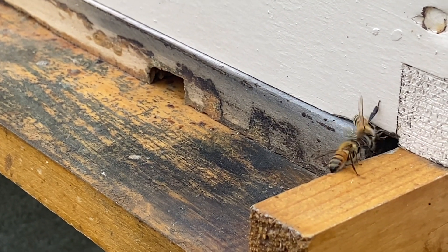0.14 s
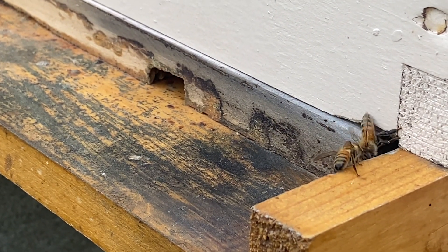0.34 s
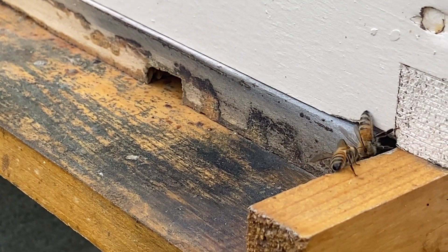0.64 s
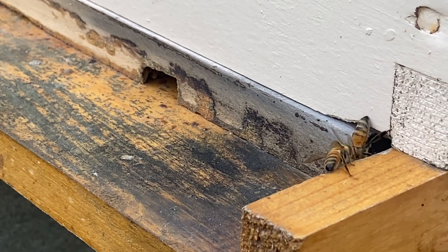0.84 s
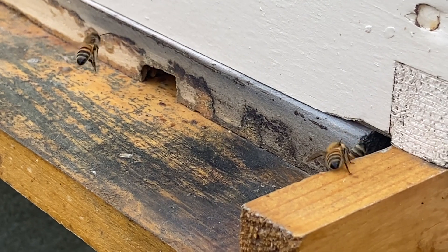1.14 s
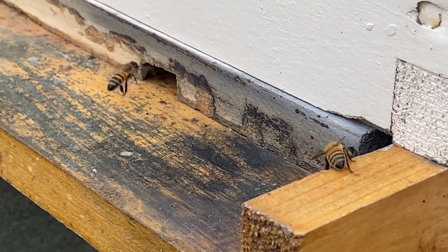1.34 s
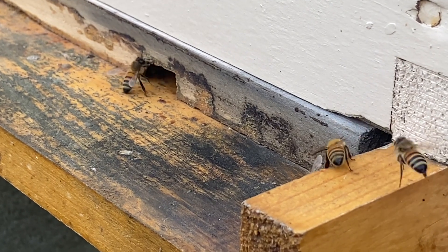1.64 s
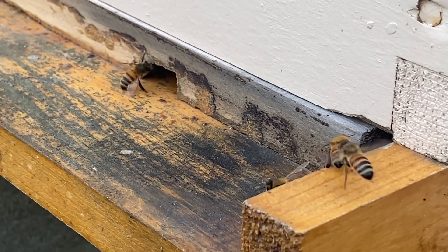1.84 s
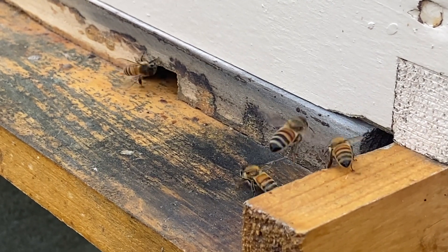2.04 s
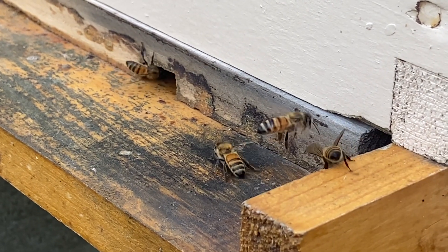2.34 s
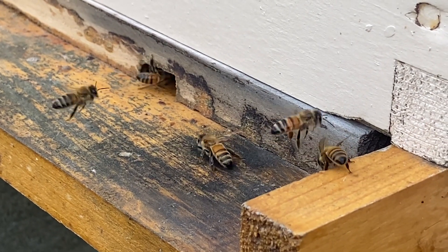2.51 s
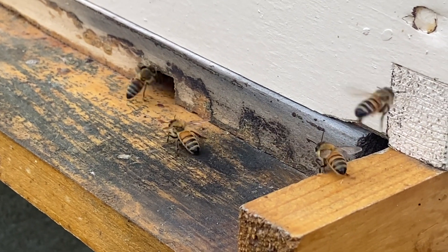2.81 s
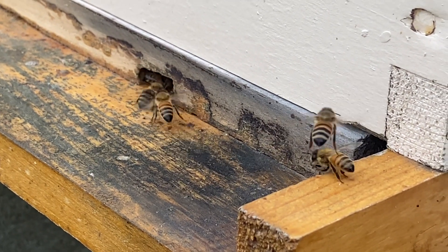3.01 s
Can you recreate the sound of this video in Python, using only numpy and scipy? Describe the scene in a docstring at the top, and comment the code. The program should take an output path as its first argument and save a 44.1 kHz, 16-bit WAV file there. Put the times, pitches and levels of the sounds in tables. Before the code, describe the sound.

Faint bee wingbeats swell and fade close to the microphone, strongest around one second, then lower near two; light wing scrapes and dull taps follow on wood, with colony hum and distant outdoor rumble throughout.

```python
"""A distant low rumble and a soft wash of open air run throughout, with a hive colony humming behind.
Honeybees come and go at the entrance, close to the microphone; one passes close after a second.
Each is a faint stack of wingbeat harmonics plus puffs of air-noise timed to the strokes.
Wings brush the landing board in short bursts of noise, bodies bump it, and feet tick on the wood."""
import sys
import numpy as np
from scipy import signal
from scipy.fft import rfft, irfft
from scipy.io import wavfile
from scipy.ndimage import uniform_filter1d

SR = 44100
rng = np.random.default_rng(int(sys.argv[2]) if len(sys.argv) > 2 else 0)


def unload_audio(sound):
    """Save the sound as a 16-bit wav file, at the path given as the first command line argument."""
    columns = np.transpose(np.atleast_2d(sound))
    # keep every value between -1 and 1, then stretch to whole-number steps
    steps = np.round(np.clip(columns, -1, 1) * 32767)
    wavfile.write(sys.argv[1], SR, steps.astype(np.int16))


N = 139797
T, HZ = np.arange(N) / SR, np.fft.rfftfreq(N, 1 / SR)
JITTER = 0.00513  # fast wingbeat unsteadiness, rms share of the pitch


def amp(db):
    """Turns decibels into an amplitude factor."""
    return 10 ** (np.asarray(db) / 20)


def unit(x):
    """Scales a signal to rms 1."""
    return x / np.sqrt(np.mean(x ** 2) + 1e-20)


def read(points, at):
    """Reads a table of (f/Hz or multiple, value) along a logarithmic axis."""
    x, y = np.transpose(points)
    return np.interp(np.log(at + 1e-9), np.log(x), y)


def follow(curve):
    """Reads a (t/s, level/dB) curve over the whole scene, in dB."""
    return np.interp(T, *np.transpose(curve))


def colour(x, points):
    """Filters a signal by a spectrum table, then sets it to rms 1."""
    return unit(irfft(rfft(x) * amp(read(points, HZ)), N))


def drift(rate_hz):
    """Slow random wander of rms 1: noise rolled off above rate_hz, without its mean."""
    hz = HZ[:513]  # the slow end is enough: a coarse curve, then interpolated
    noise = rfft(rng.standard_normal(2 * len(hz) - 2))
    slow = irfft(noise * np.exp(-(hz / rate_hz) ** 2) * (hz > 0))
    return np.interp(T, np.linspace(0, T[-1], len(slow)), unit(slow))


def diffuse(points):
    """Noise from all around: two microphones share more or less of it at each frequency."""
    # Left-right likeness of far sound: (f/Hz, correlation)
    likeness = [(40, 1), (90, 0.98), (140, 0.93), (220, 0.8), (350, 0.7), (500, 0.64), (770, 0.39),
                (1170, 0.029), (1600, 0.16), (1950, 0.98), (2400, 0.99), (3500, 1)]
    a, b = rfft(rng.standard_normal((2, N)))
    alike = np.clip(read(likeness, HZ), -1, 1)
    mid, side = a * np.sqrt(1 + alike), b * np.sqrt(1 - alike)
    return colour(irfft(np.array([mid + side, mid - side]), N), points)


def swelling(points, level):
    """Diffuse noise, its own loudness evened out, then made to follow a level curve."""
    x = diffuse(points)
    loudness = np.sqrt(uniform_filter1d((x ** 2).mean(0), size=4000))  # over about 0.09 s
    return x / loudness * amp(follow(level))


def patchy(x, depth_db, count=12):
    """The treble swells and fades a little, band by band; the bands overlap and add up to x."""
    wander_hz = 6.8
    centres = np.geomspace(1200, 15000, count)  # Hz; the end bands reach on outwards
    out = 0
    for row in np.eye(count):
        band = irfft(rfft(x) * np.interp(HZ, centres, row), N)
        out = out + band * amp(depth_db * drift(wander_hz))
    return out


def low_hum():
    """Far-off low sine tones that each waver in pitch and loudness."""
    # Tones: (f/Hz, level/dB against the rumble's level curve)
    tones = [(65, -11), (104, -11.5), (134, -12.5), (168, -15)]
    wander, swell_db = 0.0596, 5  # rms share of the pitch; rms dB
    out = 0
    for hz, db in tones:
        swell = amp(swell_db * drift(3.8))
        turns = np.cumsum(hz * (1 + wander * drift(5.4))) / SR
        out = out + amp(db) * unit(swell * np.sin(2 * np.pi * turns))
    return out


def outdoors():
    """A lumpy far-off rumble in two noise parts, plus low tones, under open air."""
    # Spectra of the deep rumble, the higher rumble and the open air: (f/Hz, relative level/dB per Hz)
    deep = [(10, -52), (25, -35), (31, -25), (40, -5), (50, -10.5), (63, 2), (80, -3.5), (100, -16.5),
            (140, -29), (400, -86)]
    higher = [(40, -27), (70, -13.5), (90, -1), (105, 1.5), (130, -3.5), (165, -8.5), (200, -12),
              (300, -23.5), (600, -43.5), (2000, -81)]
    open_air = [(30, -30), (150, 0), (250, 5.5), (340, 1.5), (480, 0.5), (570, -3), (700, -1), (900, -2.5),
                (1450, -8.2), (2100, -15.5), (2700, -18.5), (3500, -24.5), (5000, -23), (6200, -26.5),
                (8500, -28.5), (11000, -30.5), (13000, -32.5), (15500, -43)]
    # Loudness curves of the two rumbles, the deep one before its trim: (t/s, level/dB)
    deep_level = [(0, -42), (.06, -37), (.15, -43), (.4, -40.5), (.68, -42), (.88, -45), (1.01, -35.5),
                  (1.1, -45), (1.18, -38.5), (1.3, -37.5), (1.37, -42), (1.52, -38), (1.72, -42),
                  (1.9, -36), (2.0, -41), (2.12, -40), (2.23, -34.5), (2.3, -42), (2.46, -45), (2.62, -40),
                  (2.87, -38), (3.04, -43), (3.13, -35), (3.17, -38)]
    higher_level = [(0, -43), (.3, -42.5), (.42, -46), (.65, -42.5), (.85, -46), (1.05, -44.5),
                    (1.25, -40.5), (1.65, -43), (1.95, -41), (2.13, -44), (2.25, -39.5), (2.32, -47),
                    (2.6, -42.5), (2.85, -41.5), (2.93, -45.5), (3.17, -42)]
    deep_trim_db, air_db, air_swell_db = -1.48, -51.5, 0.31
    rumble = amp(deep_trim_db) * swelling(deep, deep_level) + swelling(higher, higher_level)
    tones = low_hum() * amp(follow(deep_level))
    wash = patchy(diffuse(open_air), depth_db=.5) * amp(air_db + air_swell_db * drift(5.0))
    return rumble + tones + wash


def hum(turns, lift_db=0, count=14):
    """Harmonics of the wingbeat; the overtones brighten and flutter as the bee turns."""
    # Harmonic strengths: (wingbeat multiple, relative level/dB)
    harmonics = [(1, -1.5), (2, 0), (3, -15), (4, -11), (5, -13), (6, -17), (9, -23), (14, -30)]
    flutter_db = 1.0  # rms at the wingbeat; grows with the square root of the multiple
    out = 0
    for k in range(1, count + 1):
        flutter = flutter_db * np.sqrt(k) * drift(17.4)
        level = read(harmonics, k) + lift_db * (k > 2) + flutter
        out = out + amp(level) * np.cos(2 * np.pi * (k * turns + rng.random()))
    power = np.sum(amp(read(harmonics, np.arange(1, count + 1))) ** 2) / 2
    return out / np.sqrt(power)  # about rms 1 before lift and flutter


def colony(count=6):
    """Farther bees, each at its own wingbeat, wander in pitch and loudness to either side."""
    wingbeat_hz, spread, wander, level_db = 234, .06, .03, -61.5  # spread, wander: pitch shares
    out = np.zeros((2, N))
    for offset in np.linspace(-1, 1, count):
        hz = wingbeat_hz * (1 + spread * offset + wander * drift(4.3) + JITTER * drift(27.0))
        voice = hum(np.cumsum(hz) / SR, lift_db=2.5, count=5) * amp(7.0 * drift(3.7))
        place = rng.random() * np.pi / 2
        sides = np.array([[np.cos(place)], [np.sin(place)]])
        out += (0.42 + sides) * voice  # 0.42 reaches both sides alike
    return amp(level_db) * unit(out)


def feet():
    """Tiny ticks of bees walking on wood: decaying grains of noise at random moments."""
    # Spectrum of a tick: (f/Hz, relative level/dB per Hz)
    tick_colour = [(800, -13), (2700, 2.5), (5000, 1), (8000, -4), (16000, -12)]
    ticks_per_s, level_db, spread_db, decay_s = 78, -76, 0.5, 0.0023
    strength = amp(spread_db * np.minimum(rng.exponential(1, N), 3))
    steps = (rng.random(N) < ticks_per_s / SR) * strength
    ticks = signal.lfilter([1], [1, -np.exp(-1 / (decay_s * SR))], steps)
    return amp(level_db) * colour(ticks * rng.standard_normal(N), tick_colour)


def bump(start, db, centre_hz, decay_s):
    """A soft, dull tap on wood: a band of noise that starts at once and dies away."""
    band = np.exp(-np.log2((HZ + 1) / centre_hz) ** 2)
    grain = unit(irfft(rfft(rng.standard_normal(N)) * band, N))
    return amp(db) * grain * (T >= start) * np.exp(-np.maximum(T - start, 0) / decay_s)


def brush(start, length, beat_hz, db, centre_hz):
    """A wing tip scrapes the wood once per beat: band-limited noise decaying after each touch."""
    width_octaves, decay_s, sag_db = 0.5, 0.0016, -2  # sag: level change over the brush's length
    age = np.maximum(T - start, 0)
    strokes = (T >= start) * (age < length) * np.exp(-(age % (1 / beat_hz)) / decay_s)
    sag = amp(sag_db * np.minimum(age / length, 1))
    band = np.exp(-.5 * (np.log2((HZ + 1) / centre_hz) / width_octaves) ** 2)
    scrape = irfft(rfft(strokes * sag * rng.standard_normal(N)) * band, N)
    return amp(db) * unit(scrape) * np.sqrt(length * SR / N)  # level holds over the brush's length


def bee(flight):
    """One nearby bee: a hum, and a puff of air on each down- and backstroke."""
    # Spectrum of the wing air: (f/Hz, relative level/dB per Hz)
    wing_air = [(500, -30), (1400, 9.5), (2400, -1.5), (4000, 5), (5500, 0.5), (8000, 3.1), (11000, 0),
                (13500, -5), (16000, -7)]
    fade_s, puff_width = 0.046, 0.21  # puff width in wingbeat cycles
    backstroke, steady = 0.25, 0.32  # shares of the main puff
    s, hz, hum_db, lift_db, air_db = np.transpose(flight)
    turns = np.cumsum(np.interp(T, s, hz) * (1 + JITTER * drift(30.0))) / SR
    # fades in ahead of the first point and out after the last
    present = np.clip(1 + np.minimum(T - s[0], s[-1] - T) / fade_s, 0, 1)
    down, back = (np.exp(-(((turns + shift) % 1 - .5) / puff_width) ** 2) for shift in (0, .5))
    puffs = steady + down + backstroke * back
    air = colour(puffs * rng.standard_normal(N), wing_air)
    tone = amp(np.interp(T, s, hum_db)) * hum(turns, np.interp(T, s, lift_db))
    return present * (tone + amp(np.interp(T, s, air_db)) * air)


def scene():
    """Near bees and the board in the middle, colony and surroundings spread around them."""
    # One table per bee: (t/s, wingbeat f/Hz, hum level/dB, overtone lift/dB, wing air level/dB)
    flights = [
        [(0, 246.4, -75, 4, -67), (.15, 248.8, -70, -7, -66), (.42, 244.8, -62, -7, -70),
         (.6, 245, -64.5, 5, -72), (.7, 246, -59, 7, -67.5), (.82, 239, -68, 13, -68.5),
         (.89, 238.8, -59.5, 7, -63), (.935, 235.4, -53, 3, -60.5), (1.02, 222.7, -48, -2.5, -60.5),
         (1.07, 214.3, -52.3, -1, -62), (1.13, 193.9, -49.5, -10, -65.5), (1.19, 194, -74, -4, -67.5)],
        [(1.09, 228.8, -57.5, 6.5, -80), (1.17, 243.5, -61, 6, -72), (1.23, 249.4, -57, -2, -67),
         (1.28, 253.3, -54.5, 1, -67.5), (1.34, 243.3, -65, 7, -69), (1.42, 229.4, -66, 6, -69),
         (1.48, 222.9, -58, -6, -75), (1.54, 220.5, -59, 2, -75), (1.6, 206, -64, -5, -81)],
        [(1.44, 247.3, -78, -2, -85), (1.5, 236.5, -57, -1, -85), (1.56, 245.2, -67, 13, -77),
         (1.64, 233, -67, 3, -81), (1.79, 237.4, -71, 14, -71)],
        [(1.55, 183, -64, -3, -77), (1.7, 183, -61, -3, -76), (1.83, 181, -57, -5, -75),
         (1.92, 179, -58, -2, -78), (1.97, 174, -57, -3, -79), (2.01, 171.5, -51.5, -8, -74),
         (2.1, 170.5, -50, -10, -75), (2.15, 170, -62, -4, -79), (2.22, 166, -63, -4, -83)],
        [(2.35, 168, -72, -9, -80), (2.4, 168, -50, -19, -86), (2.45, 172, -66, -6, -90)],
        [(2.42, 254.7, -81, -7, -92), (2.49, 255.5, -57, -4, -80), (2.56, 247, -71.5, -5, -81),
         (2.64, 248, -69.5, 8, -71), (2.79, 244.5, -57, -8, -84), (2.88, 240.5, -63, -4, -87),
         (2.97, 235.7, -68, 10, -78.5), (3.08, 219.5, -63, 4, -69), (3.17, 228.7, -66, -8, -81)],
    ]
    # Wings brushing the wood: (t/s, length/s, wingbeat f/Hz, level/dB, centre f/Hz)
    brushes = [(0.615, .009, 220, -70.5, 11500), (0.733, .014, 214, -67, 12000),
               (.905, 0.038, 224.2, -64.5, 11300), (0.914, 0.04, 225, -63.5, 2380),
               (.918, 0.019, 229, -57, 930), (1.534, 0.033, 234, -67, 4300),
               (2.128, 0.022, 193, -68.5, 3200), (2.869, 0.097, 247, -68, 4630),
               (3.068, 0.023, 207, -68, 7000), (3.091, 0.018, 207, -64, 8200),
               (3.117, .02, 207, -66, 13000)]
    # Bees bumping the board: (t/s, onset level/dB, centre f/Hz, decay/s)
    bumps = [(1.84, -73, 2100, .005), (2.445, -51.5, 1090, 0.0033), (2.606, -59, 2100, 0.0056),
             (2.694, -58, 1700, 0.0055)]
    bees = patchy(sum(bee(flight) for flight in flights), depth_db=1.5)
    board = feet() + sum(bump(*row) for row in bumps) + sum(brush(*row) for row in brushes)
    return outdoors() + colony() + board + bees


def record(dry):
    """The top treble reaches the right channel slightly late; then a steep band limit."""
    # Lead of the left channel over the right: (f/Hz, phase/rad)
    left_lead = [(7500, 0), (7620, .9), (9000, 3.14), (10900, 6.2), (11600, 6.35), (11800, 7.2),
                 (13250, 9.42), (14450, 11.2), (14900, 12.57)]
    edge_hz = 15700
    lead = np.interp(HZ, *np.transpose(left_lead))
    delays = np.array([np.ones(len(HZ)), np.exp(-1j * lead)])
    stereo = irfft(rfft(dry) * delays, N)
    low_pass = signal.firwin(511, edge_hz, window=("kaiser", 9), fs=SR)
    return signal.oaconvolve(stereo, low_pass[None], "same")


dry = scene()
out = record(dry)
unload_audio(out)
```